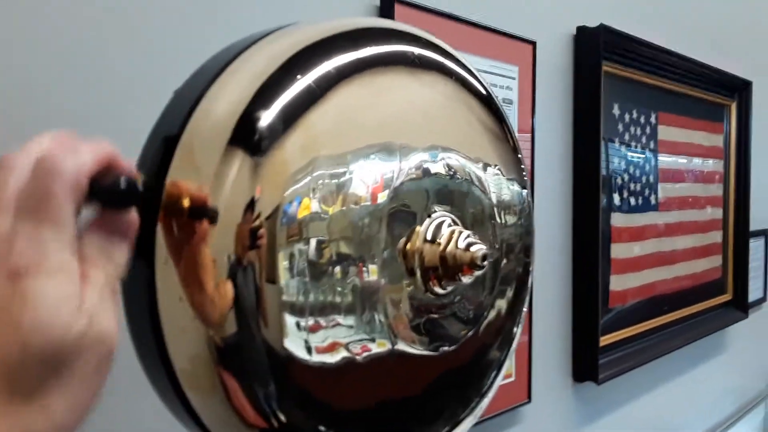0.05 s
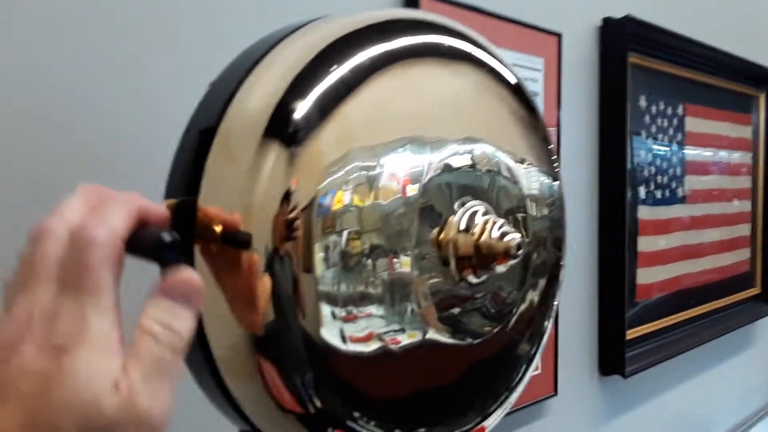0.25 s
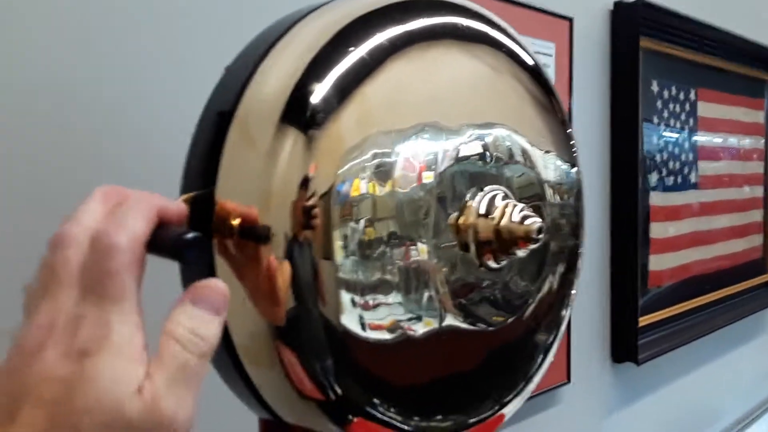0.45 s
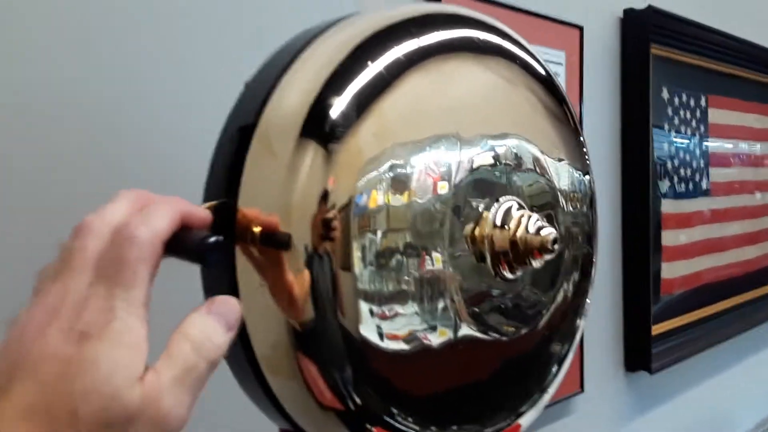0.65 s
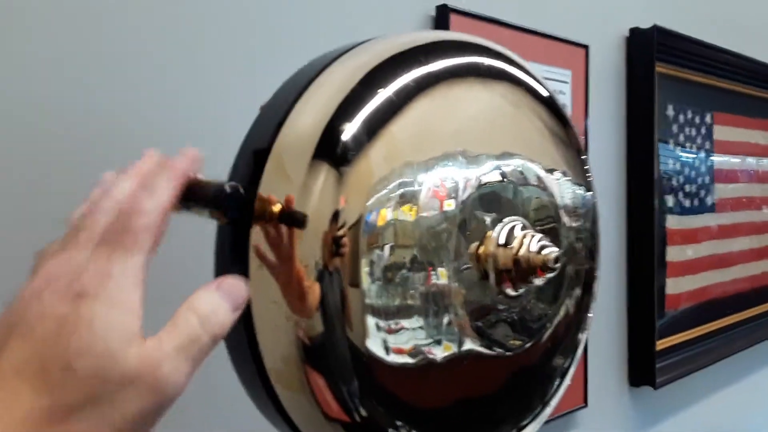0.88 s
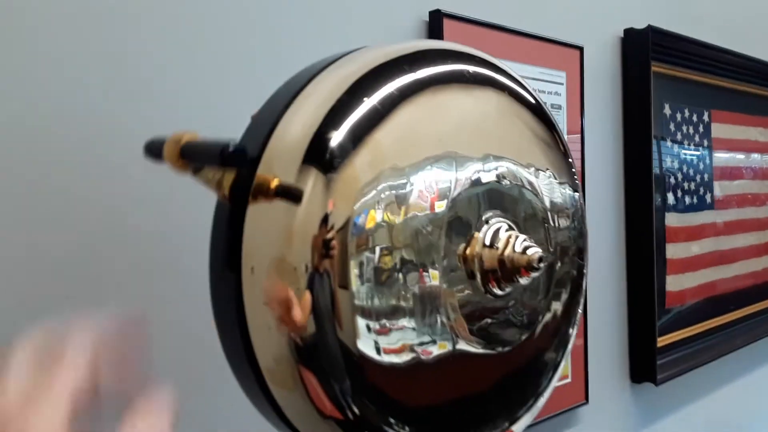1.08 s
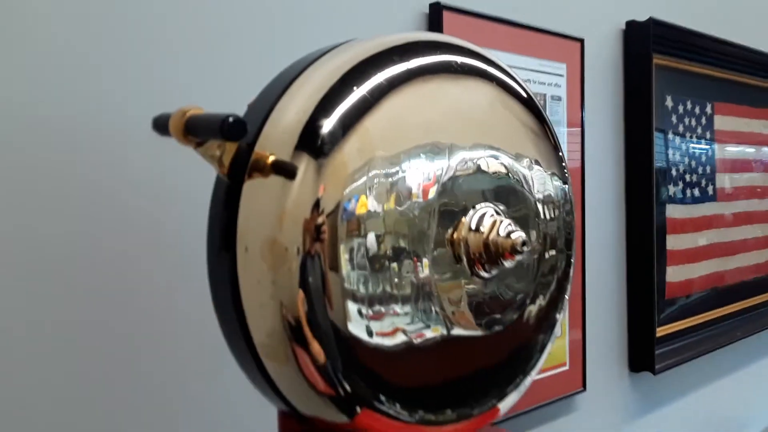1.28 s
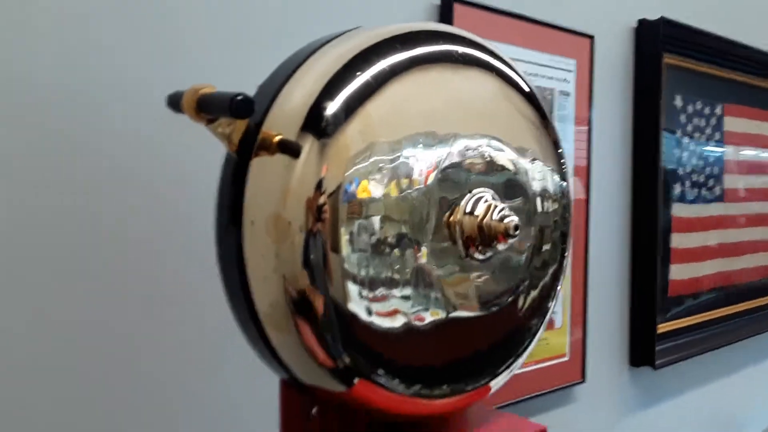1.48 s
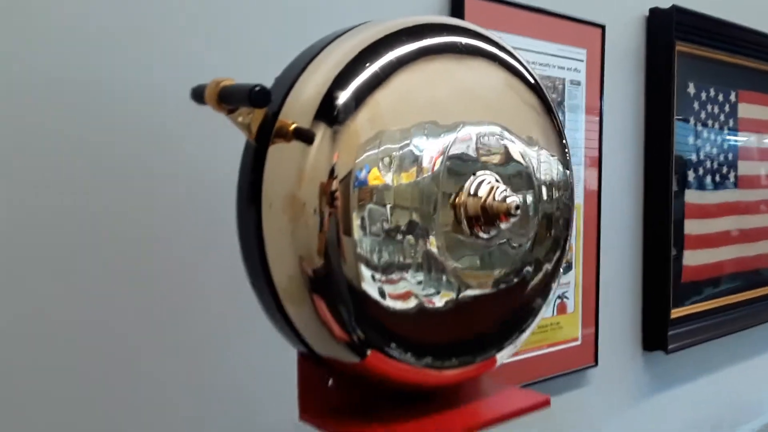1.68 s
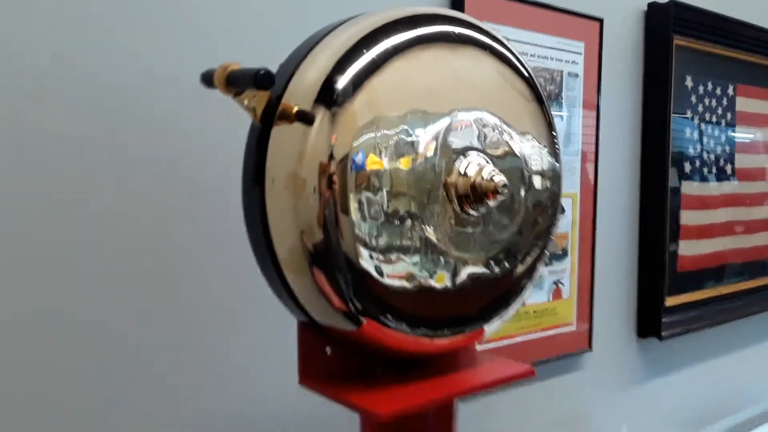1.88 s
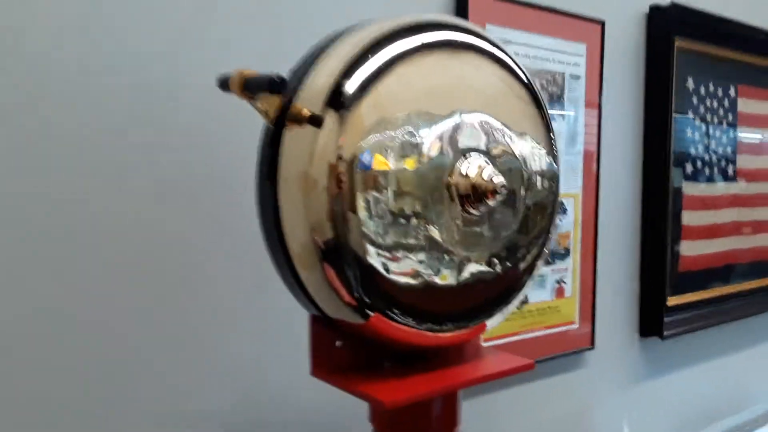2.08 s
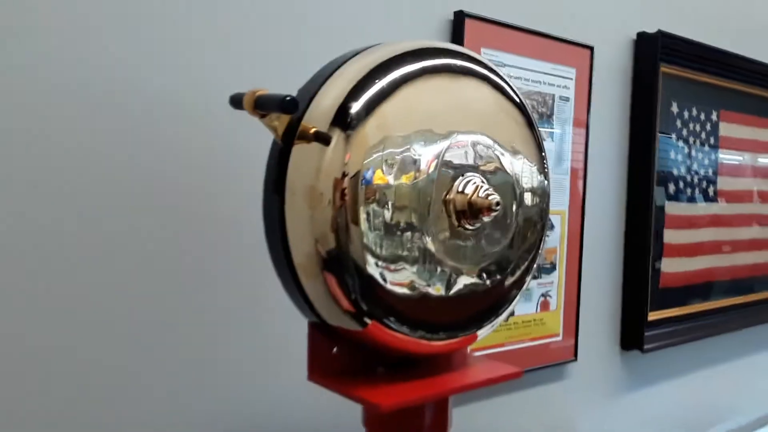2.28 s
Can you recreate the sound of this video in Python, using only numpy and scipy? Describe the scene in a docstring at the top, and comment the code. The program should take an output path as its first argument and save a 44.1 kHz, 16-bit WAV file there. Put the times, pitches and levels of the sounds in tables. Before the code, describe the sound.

One loud clang from a big metal bell rings on in a quiet room.

```python
"""A large brass gong bell on a stand, tripped by hand in a quiet room, heard on a moving stereo pair.
The lever clicks, the hammer thumps and strikes once, and the works rattle to rest while the bell's
paired modes beat. Ventilation rumbles behind. The recorder's gain control ducks under the blow,
holds, then lets the hum of the bell and the room swell back."""
import sys
import numpy as np
from scipy import signal
from scipy.fft import rfft, irfft
from scipy.io import wavfile
from scipy.ndimage import uniform_filter1d, minimum_filter1d

SR = 44100
rng = np.random.default_rng(int(sys.argv[2]) if len(sys.argv) > 2 else 0)


def persist_wave(psi):
    """Save psi, clipped to +-1, as 16-bit WAV."""
    counts = np.round(np.clip(psi, -1, 1) * 32767).astype(np.int16)
    wavfile.write(sys.argv[1], SR, np.atleast_2d(counts).T)


N = 108045
TIME_S = np.arange(N) / SR
STRIKE_S = 0.2355


def from_db(db):
    """Decibels to gain."""
    return 10 ** (np.asarray(db) / 20)


def at_hz(spectrum, hz):
    """Level of a spectrum in dB, interpolated on a log-frequency axis."""
    freqs, db = np.transpose(spectrum)
    return np.interp(np.log(hz + 1e-9), np.log(freqs), db)


def gain_curve(points):
    """Gain gliding through (time_s, gain_db) points."""
    return from_db(np.interp(TIME_S, *np.transpose(points)))


def panned(db):
    """Microphone gains with the left one db louder than the right."""
    pair = from_db(np.array([[db], [-db]]) / 2)
    return pair / np.sqrt(np.mean(pair ** 2))


def noise(spectrum, alike, pan_db):
    """Coloured stereo noise of rms 1; alike is the correlation between the microphones."""
    colour = from_db(at_hz(spectrum, np.arange(N // 2 + 1) * SR / N))
    mid, side = irfft(rfft(rng.standard_normal((2, N))) * colour, N)
    pair = np.sqrt(1 + alike) * mid + np.sqrt(1 - alike) * side * np.array([[1], [-1]])
    return panned(pan_db) * pair / pair.std()


def decay(start_s, t60_s):
    """A 1 ms onset, then a fall of 60 dB in t60_s."""
    age = TIME_S - start_s
    return np.clip(age * 1000, 0, 1) * from_db(-60 * np.maximum(age, 0) / t60_s)


def wander(rate_hz, steps=400):
    """Slow random complex gain of spread 1, one for each microphone."""
    pole = np.exp(-2 * np.pi * rate_hz * N / SR / steps)
    white = rng.standard_normal((2, 2 * steps)) + 1j * rng.standard_normal((2, 2 * steps))
    slow = signal.lfilter([1], [1, -2 * pole, pole * pole], white)[:, steps:]
    position = np.linspace(0, steps - 1, N)
    return np.array([np.interp(position, np.arange(steps), side) for side in slow / slow.std()])


# Ventilation rumble filling the room: freq_hz, density_db
RUMBLE_SPECTRUM = [(25, -22), (50, -25), (70, -9), (85, -3.5), (105, -9.5), (125, -2.5), (160, -3.5),
                   (200, 1), (260, -6.5), (380, -7.5), (520, -20.5), (900, -55)]
# Soft hiss behind everything: freq_hz, density_db
HISS_SPECTRUM = [(200, -22), (450, 3.5), (900, -0.5), (1800, -5.5), (3500, -17.5), (6500, -25.5),
                 (9500, -44.5), (15500, -33)]

def room_tone():
    """Ventilation rumbles almost alike at both microphones, under a wider hiss."""
    rumble = from_db(-47) * noise(RUMBLE_SPECTRUM, alike=0.9, pan_db=-0.5)
    hiss = from_db(-49) * noise(HISS_SPECTRUM, alike=0.3, pan_db=-2.7)
    return rumble + hiss


# Fan tones, dead centre in the background: pitch_hz, level_db, width_hz
FAN_TONES = [(89.6, -55, 17), (123, -58, 3.2), (195.8, -47.5, 5.3)]

def fan_hum():
    """The ventilation fan hums in narrow, wavering bands."""
    hum = 0
    for hz, db, width_hz in FAN_TONES:
        tone = wander(width_hz / 2, steps=600)[0] * np.exp(2j * np.pi * hz * TIME_S)
        hum += from_db(db) * np.sqrt(2) * tone.real
    return hum


# Handling ticks, well to the left: start_s, level_db, t60_s
HANDLING_TICKS = [(1.851, -50.5, 0.21), (1.995, -35.5, .015), (2.003, -40.5, 0.038), (2.133, -50, 0.026),
                  (2.232, -45, .02)]
# Their thin colour: freq_hz, density_db
TICK_SPECTRUM = [(1000, -23), (2500, 5), (4500, 2.5), (7500, -15.5), (10000, -33), (15000, -30)]

def handling():
    """Faint ticks of handling noise come late in the ring."""
    envelope = sum(from_db(db) * decay(start_s, t60_s) for start_s, db, t60_s in HANDLING_TICKS)
    return envelope * noise(TICK_SPECTRUM, alike=0.37, pan_db=13.5)


def contact(start_s, t60_s):
    """Envelope of a short contact and its tail in the room."""
    room_tail = from_db(-10.5) * decay(start_s, t60_s=0.41)
    return np.hypot(decay(start_s, t60_s), room_tail)


# Knocks of lever and hammer, right of centre: start_s, body_db, edge_db
WORKS_KNOCKS = [(0.037, -40, -53.5), (.148, -27, -46), (0.158, -30.5, -57), (.340, -6.5, -17),
                (0.349, -11, -6), (.420, -28, -31), (.551, -24, -15), (0.571, -24, -21),
                (0.681, -31.5, -53), (0.746, -33.5, -48.5), (0.801, -30, -42), (0.822, -27.5, -33),
                (0.851, -41.5, -40), (0.897, -25.5, -49), (0.908, -26.5, -60), (1.000, -25.5, -61),
                (1.097, -35.5, -38.5), (1.185, -32, -66)]
# Hollow body of a knock: freq_hz, density_db
BODY_SPECTRUM = [(40, -31.5), (100, -24.5), (230, -3), (370, -3), (560, -16.5), (780, 5), (960, -13.5),
                 (1200, 5), (1700, -8.5), (2400, -3), (3200, -18.5), (6000, -39.5)]
# Its bright metallic edge: freq_hz, density_db
EDGE_SPECTRUM = [(1500, -16.5), (2700, -2), (4500, 4.5), (7500, -3.5), (9000, -25.5), (12500, -22.5),
                 (15700, -27.5)]

def works():
    """The lever is drawn and the linkage rattles to rest; the knocks add in power."""
    body_power = sum((from_db(db) * contact(s, t60_s=0.07)) ** 2 for s, db, _ in WORKS_KNOCKS)
    edge_power = sum((from_db(db) * contact(s, t60_s=0.049)) ** 2 for s, _, db in WORKS_KNOCKS)
    body = np.sqrt(body_power) * noise(BODY_SPECTRUM, alike=0.45, pan_db=-2)
    edge = np.sqrt(edge_power) * noise(EDGE_SPECTRUM, alike=0.1, pan_db=-7.5)
    return body + edge


# Jolts of the stand, right of centre: start_s, level_db
STAND_JOLTS = [(0.2364, 10.5), (.243, 2.5), (.255, -1.5), (0.263, -3.5), (0.274, -7.5)]
# Their low thump: freq_hz, density_db
THUMP_SPECTRUM = [(25, -29.5), (55, -20.5), (90, -3), (140, 5.5), (300, -6), (800, -4.5), (1500, -32.5)]

def stand_thump():
    """The hammer jolts the stand in a quick run of weakening thumps."""
    envelope = sum(from_db(db) * decay(start_s, t60_s=0.048) for start_s, db in STAND_JOLTS)
    return envelope * noise(THUMP_SPECTRUM, alike=0.086, pan_db=-5.5)


# Hard contact, straight from the bell: freq_hz, density_db
CRASH_SPECTRUM = [(200, -17), (700, -8.5), (1000, -11.5), (1700, -1.5), (2600, -1), (4300, 5), (6500, -1),
                  (8300, -13), (9500, -21.5), (15700, -27.5)]
# The clang coming back from around the room: freq_hz, density_db
WASH_SPECTRUM = [(200, -20), (1000, -16.5), (2600, 1), (4300, 1), (8200, -10), (9000, -42)]

def hammer():
    """Metal crashes on metal and leaves a diffuse wash in the room."""
    crash = decay(STRIKE_S, t60_s=0.19) * noise(CRASH_SPECTRUM, alike=0.0996, pan_db=-5.5)
    wash = decay(STRIKE_S, t60_s=1) * noise(WASH_SPECTRUM, alike=0, pan_db=-3)
    return from_db(10) * crash + from_db(-6) * wash


# Colour of the bell's high modes, spread wide across the pair: pitch_hz, relative_db
SHIMMER_SPECTRUM = [(3300, 3), (4500, -2.5), (7000, 5), (8500, -5.5), (9500, -11.5), (12000, -5.5),
                    (15700, -13.5)]

def bell_shimmer(bands=64, split_hz=9):
    """A crowd of weak high modes, one close pair to a band, dying sooner the higher they lie."""
    edges_hz = np.linspace(3300, 15700, bands + 1)
    shimmer = 0
    for low, high, (place, strength) in zip(edges_hz, edges_hz[1:], rng.random((bands, 2))):
        hz = low + place * (high - low)
        t60_s = 0.67 * (5000 / hz) ** 0.25
        pair_hz = hz + split_hz * rng.standard_normal((2, 1))
        phases = rng.random((2, 2, 1))  # in cycles, per microphone and mode
        pair = np.sin(2 * np.pi * (pair_hz * TIME_S + phases)).sum(axis=1) / np.sqrt(2)
        level_db = at_hz(SHIMMER_SPECTRUM, hz) - 20.1 + 6.3 * strength
        shimmer += from_db(level_db) * decay(STRIKE_S, t60_s) * pair
    return shimmer


# Modes of the brass bell, each with a close twin:
# pitch_hz, level_db, t60_s, pan_db, twin_offset_hz, twin_level_db, twin_t60_s
BELL_MODES = [ (538.3, -24.5, 10.95, 0.5, 1.25, -37.5, 12), (947.4, -26, 45, 2.5, 9.5, -33.5, 14),
              (1426.8, -14, 7.04, -3.5, 5.5, -24.5, 2.5), (1585.5, 0, 1.1, 0, -3.5, -25, 1.5),
              (1958.3, 3, 1.05, -8.5, -0.24, -9.5, 3.53), (2545.7, 4, 0.62, -8, 0.5, -5.5, 2.245),
              (2746.5, 1.5, 0.71, -6, -1.5, -15.5, 2.12), (2844, -8.5, 0.93, -3.5, 2, -29, 3.7),
              (3191.5, 9, 0.79, 0, -4.1, -26.5, 3), (3620, 2, .5, 2, -4, -26, 2.2),
              (3658, -1, .55, 0, 3, -30, 2), (3955.7, 4, .46, 4, 1.4, -24, 2.3),
              (4313.5, 1.5, .56, -3, -1.8, -24, 2.1), (4590, 6.5, .54, -11, 1.4, -26, 1.9),
              (4693, -2.5, 0.82, -5, -57, -14, .6), (5141.2, -1.5, .52, 0, 3, -30, 1.7),
              (5585.4, -2, .72, 2, -1.7, -18, 1.2), (5900, -9.5, .6, 1, 0.5, -37, 1.5),
              (6240, -17, .55, 5.5, 7.5, -27.5, 1.7), (6570, -10.5, .6, -2, 4, -30, 1.2),
              (6466.6, 1, .48, -3, 3, -29, 1.5), (7040, -8.5, 0.88, -8.5, 2.5, -26.5, 0.92),
              (7065.8, 3, .53, -7, -3, -28, 1), (7278.1, -1.5, .5, -3, 4, -27, .8),
              (7870, -1, .55, -4, 2, -18, 0.98), (8200, -9.5, 0.43, 0, 17, -13, 0.99),
              (8300, -0.5, 0.41, -1, 167, -5.5, 0.55), (9430, -8, .5, -7.5, 9, -31, 0.37),
              (10560, -8.5, 0.46, -2, 5.5, -29, .7), (12300, -20.5, .52, -3, 8.5, -30, 0.71)]
# The whole ring at the moving microphones: time_s, gain_db
RING_GAIN = [(.24, 0), (.38, 0.5), (.5, 1), (.68, -2.5), (.8, 1.5), (1.05, 0.5), (1.35, -0.5),
             (1.599, -0.5), (1.721, -0.5), (1.861, 1.5), (2.02, 2), (2.321, -1), (2.45, -1)]
# The third partial wavers and dips: time_s, gain_db
THIRD_PARTIAL_GAIN = [(.3, 3.5), (.9, -2), (1.2, 2), (1.3, -2.5), (1.42, 3), (1.509, -6.5), (1.6, 0.5),
                      (1.85, 1), (2.04, 1), (2.12, -7), (2.2, 0.5), (2.45, -1.5)]
# The fifth partial swells and dips: time_s, gain_db
FIFTH_PARTIAL_GAIN = [(.3, -1.5), (.45, 2.5), (.6, -2), (.9, 0), (1.25, 2.5), (1.52, -3), (1.72, -4.5),
                      (1.87, 5.5), (2.1, -1.5), (2.32, -6), (2.45, 0)]

def bell(wide_hz=950, direct_share=0.32, swell_s=0.076):
    """Twin modes beat and die away; part of the ring arrives at once, the rest builds in the room."""
    age = np.maximum(TIME_S - STRIKE_S, 0)
    partial_gains = {2: THIRD_PARTIAL_GAIN, 4: FIFTH_PARTIAL_GAIN}
    ring = 0
    for k, (hz, db, t60_s, pan_db, offset_hz, twin_db, twin_t60_s) in enumerate(BELL_MODES):
        twin = from_db(twin_db) * decay(STRIKE_S, twin_t60_s) * np.exp(2j * np.pi * offset_hz * age)
        envelope = from_db(db) * decay(STRIKE_S, t60_s) + twin
        if hz < 1000:  # the lowest partials start with a brief bloom
            envelope *= 1 + from_db(12.5) * decay(STRIKE_S, t60_s=0.46)
        if k in partial_gains:
            envelope *= gain_curve(partial_gains[k])
        # Above wide_hz the microphones sit in unlike parts of the field, a quarter cycle apart.
        phase_gap = np.pi / 2 * min((hz / wide_hz) ** 2, 1) * (-1) ** k
        steady = panned(pan_db) * np.exp(1j * phase_gap * np.array([[0.5], [-0.5]]))
        # Partials waver as the microphones move, the low ones least.
        waver = 0.44 * min(hz / 1760, 1) * wander(rate_hz=6.9)
        tone = np.exp(2j * np.pi * (hz * age + rng.random()))
        ring += (envelope * (steady + waver) * tone).real
    swell = 1 - (1 - direct_share) * np.exp(-age / swell_s)
    return ring * swell * gain_curve(RING_GAIN)


def scene():
    """Bell, mechanism and room as they reach the microphones."""
    strike = bell() + bell_shimmer() + hammer() + stand_thump()
    return strike + works() + fan_hum() + handling() + room_tone()


def record(dry):
    """The recorder's limiter catches the blow, holds part of its cut, then lets go; the top is cut off."""
    ceiling_db, max_held_db, release_db_per_s = -10.5, 14.5, 49
    sense, hold = int(0.0033 * SR), int(0.98 * SR)
    power = uniform_filter1d(np.mean(dry ** 2, axis=0), sense)
    over_db = np.maximum(10 * np.log10(np.maximum(power, 1e-12)) - ceiling_db, 0)
    capped_db = np.minimum(over_db, max_held_db)
    held_db = -minimum_filter1d(-capped_db, hold, origin=(hold - 1) // 2, mode="constant")
    ramp_db = release_db_per_s * TIME_S
    released_db = np.maximum.accumulate(held_db + ramp_db) - ramp_db
    cut_db = uniform_filter1d(np.maximum(over_db, released_db), size=64)
    limited = np.clip(dry * from_db(-cut_db), -1, 1)
    lowpass = signal.cheby2(16, 70, 16150, fs=SR, output="sos")
    return signal.sosfilt(lowpass, limited)


dry = scene()
out = record(dry)
persist_wave(out)
```